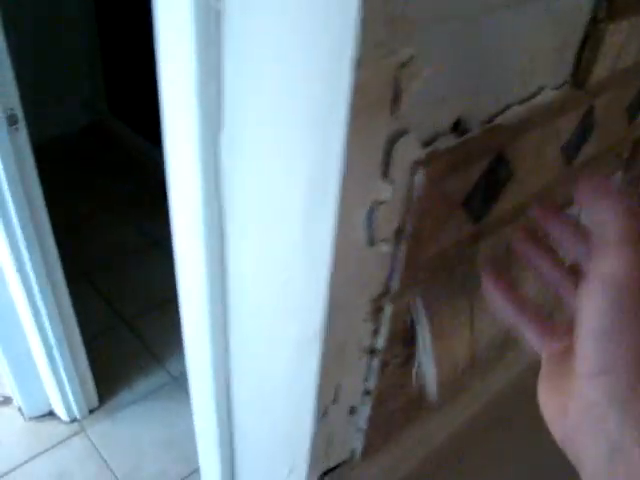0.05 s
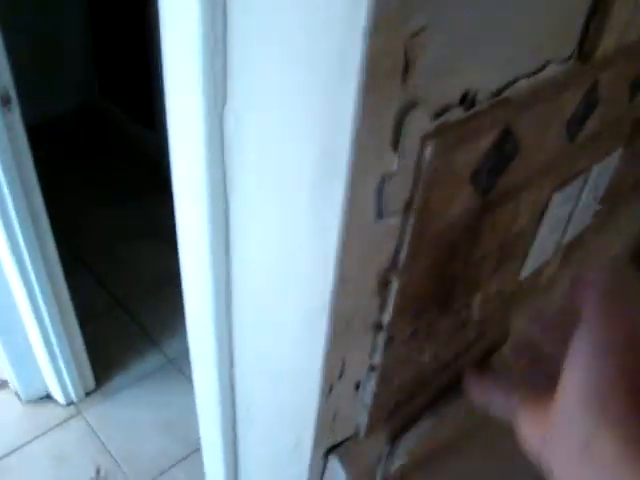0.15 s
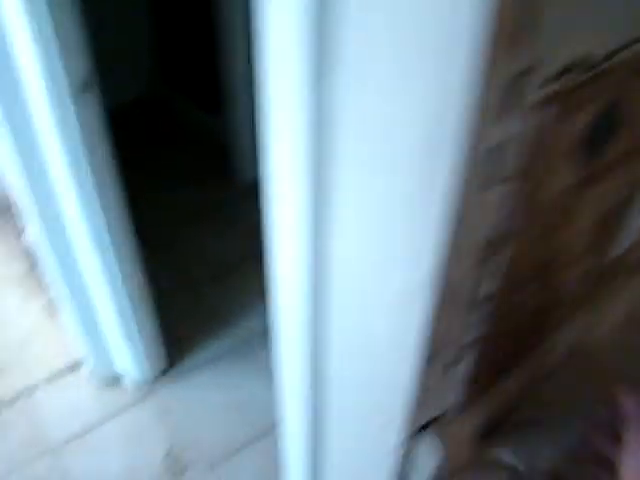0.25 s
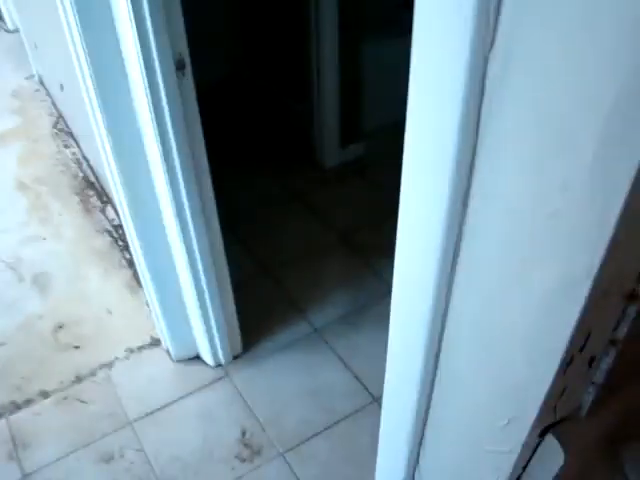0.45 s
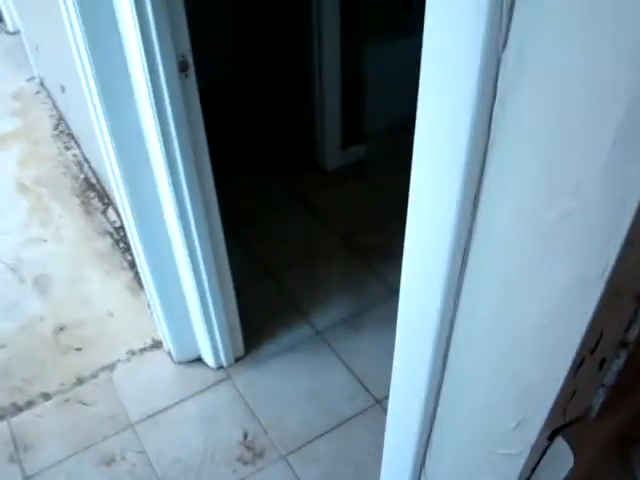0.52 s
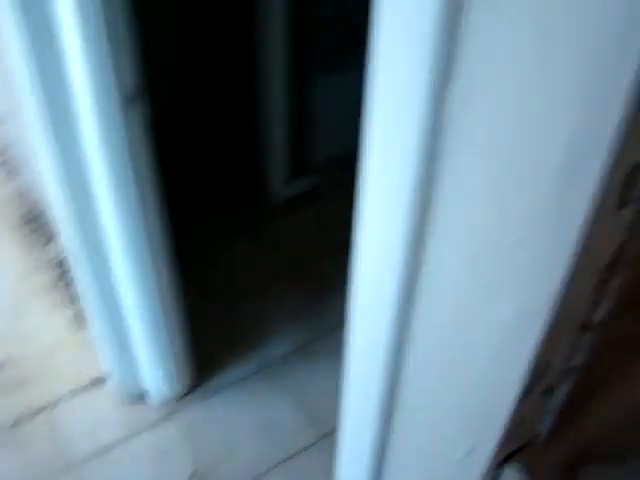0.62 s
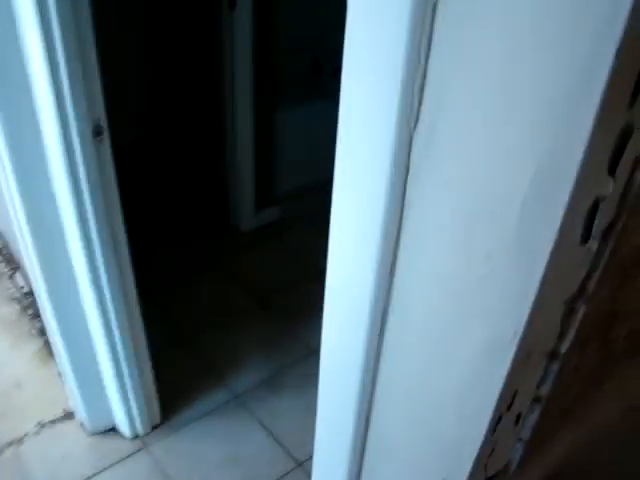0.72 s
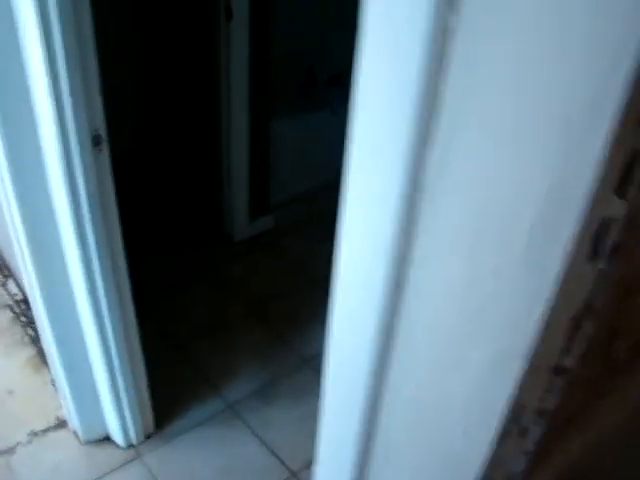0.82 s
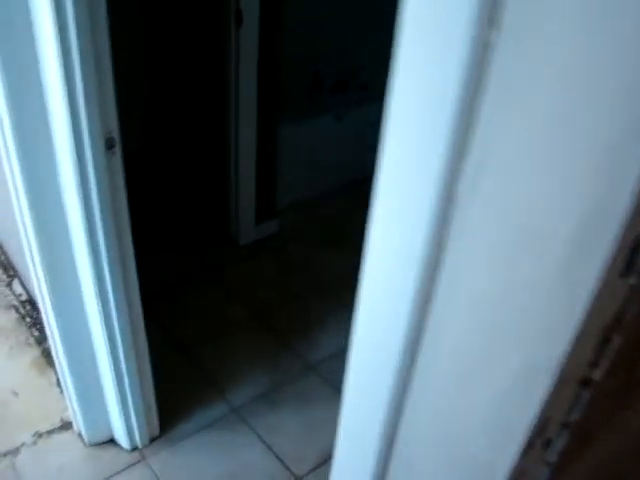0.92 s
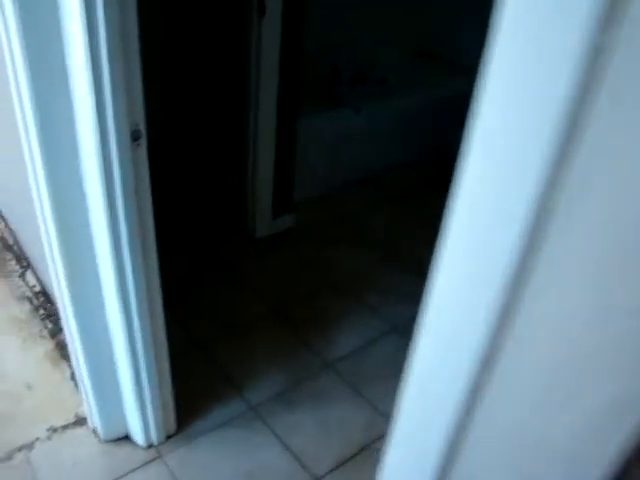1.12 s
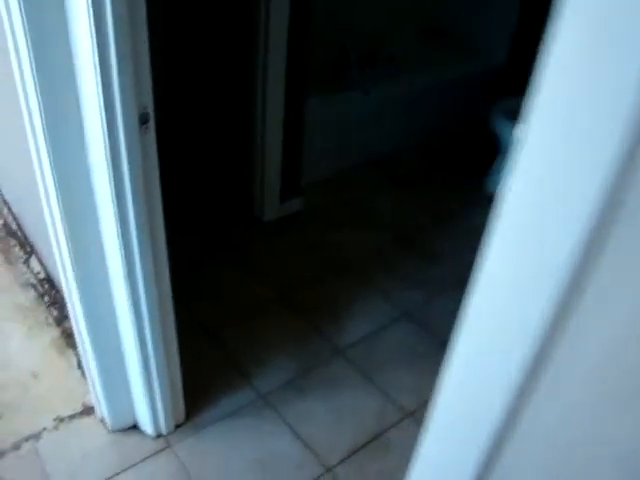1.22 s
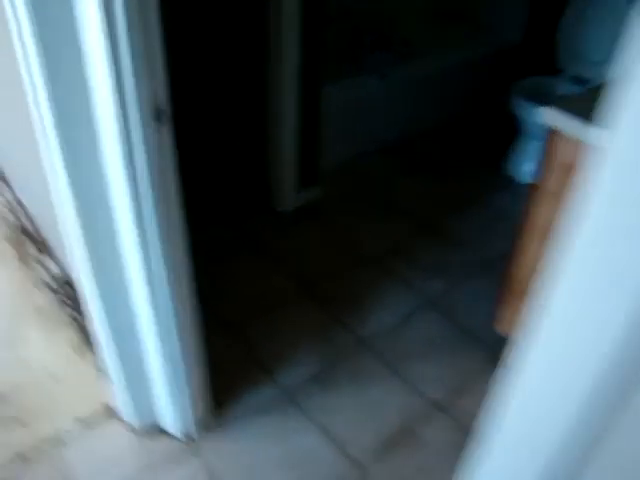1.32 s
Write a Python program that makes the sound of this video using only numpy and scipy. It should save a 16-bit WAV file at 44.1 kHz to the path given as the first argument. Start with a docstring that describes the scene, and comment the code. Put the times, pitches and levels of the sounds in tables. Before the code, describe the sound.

A wall tile snaps loose, crashes onto a hard floor and shatters in an echoing room.

```python
"""A loose wall tile is pried off in a bare, echoing kitchen. Mortar ticks and grates; the tile clinks
free and snaps. It crashes on the hard floor and breaks, setting the room's modes ringing; the small
recorder limits the crash. Pieces clatter, crumbs scatter, and a last chip clicks nearby as the room
rings out. Soft handling bumps follow. Room air and a low hum lie underneath."""
import sys
import numpy as np
from scipy import signal
from scipy.fft import rfft, irfft, next_fast_len
from scipy.io import wavfile
from scipy.ndimage import uniform_filter1d, minimum_filter1d, map_coordinates

SR = 44100
rng = np.random.default_rng(int(sys.argv[2]) if len(sys.argv) > 2 else 0)


def store_wav(level_fs):
    """Save 16-bit WAV to argv[1]."""
    pcm = np.round(np.clip(np.atleast_2d(level_fs), -1, 1) * 32767)
    wavfile.write(sys.argv[1], SR, pcm.T.astype(np.int16))


N = 59535


def crash():
    """The tile slaps down and breaks in a quick run of blows, which wake the room's resonances."""
    blows = [(0.264, -7, 0.0776, -3), (0.2724, -5.5, 0.0348, 0), (0.278, -4.5, 0.0697, 1),
             (0.2841, -11, 0.0467, -1), (0.294, -7.5, 0.0676, 1), (0.3297, -11, .02, 3),
             (0.354, -16, 0.049, -4), (0.378, -23, 0.053, 3.5)]  # t/s, level/dB, t60/s, tilt/(dB/oct)
    colour = [(40, -62), (130, -27), (250, -4.5), (500, -1.5), (850, 2.5), (1400, 2), (2600, -6),
              (3500, -12), (6000, -20.5), (10000, -31.5)]  # blow spectrum: f/Hz, level/dB
    room_modes = [(252, -8, 1), (429, -4, 1), (467, -3, 1), (506, -2, 1), (572, -2, 1.1), (640, 0, 1.2),
                  (815, -1, 1.2), (932, 1, 1.2), (1027, 0, 1), (1142, -2, 1.2), (1179, 1, 1.2),
                  (1266, -1, 1.1), (1419, 0, 1), (1492, -4, 1), (1685, -5, 1.1), (1797, -3, 1)]  # f/Hz, relative level/dB, t60/s
    return contacts(blows, colour, room_db=1.4767) + room_ring(blows[0][0], room_modes, gain_db=-24)


def pieces():
    """Smaller, brighter pieces clatter down and wake higher resonances."""
    landings = [(0.396, -17, 0.057, -2.5), (0.4011, -8, 0.0171, 2), (0.413, -13, 0.07, .5),
                (0.429, -13, 0.0564, 1), (0.4495, -18.5, 0.107, 0), (0.4679, -15.5, 0.06, 0.5),
                (0.5053, -30.5, 0.0295, 7.5), (0.549, -35, 0.017, 7)]  # t/s, level/dB, t60/s, tilt/(dB/oct)
    colour = [(40, -39), (140, -24.5), (250, -5.5), (500, -4.5), (1100, -3.5), (1600, 2.5), (2200, 3),
              (2700, -4.5), (3200, -5.5), (5500, -19.5), (10000, -29)]  # landing spectrum: f/Hz, level/dB
    high_modes = [(1615, 0, .9), (1890, -1, .8), (2169, 0, .9), (2256, 1, .9), (2284, 0, .9),
                  (2880, -8, .7), (3031, -6, .5)]  # f/Hz, relative level/dB, t60/s
    return contacts(landings, colour, room_db=0) + room_ring(landings[0][0], high_modes, gain_db=-29.5)


def snaps():
    """Mortar and glaze crack near the microphone, short and bright."""
    cracks = [(0.1358, -22.5, 0.0043, 0), (0.140, -28.5, 0.0364, 8), (0.151, -35.5, 0.025, -1.5),
              (0.2472, -5, 0.0102, -2.5), (0.2521, -15.5, 0.024, 2.5), (0.265, -22.5, 0.0047, -4.5),
              (0.4008, -13.5, 0.0032, -6), (0.8835, -33, 0.0147, 14), (0.887, -19, 0.00487, 14),
              (0.889, -28, 0.0333, -3), (0.954, -31, 0.0057, -4.5)]  # t/s, level/dB, t60/s, tilt/(dB/oct)
    colour = [(100, -34), (400, -12), (1200, -15), (2100, -2), (3100, -1.5), (4400, 2.5), (5600, -8.5),
              (7000, -4), (8000, -7), (9300, -5.5)]  # crack spectrum: f/Hz, level/dB
    return contacts(cracks, colour, room_db=-13)


def thuds():
    """The weight of the whole tile bumps wall and floor."""
    knocks = [(0.138, -40.5, 0.067, 2), (0.151, -41, 0.136, -1.5), (0.249, -18.5, 0.111, -0.5),
              (0.263, -18.5, 0.061, -0.5), (0.285, -16, 0.068, -5.5), (0.322, -21, 0.053, 0.5),
              (0.470, -25.5, 0.066, -3.5)]  # t/s, level/dB, t60/s, tilt/(dB/oct)
    colour = [(30, -33), (70, -27), (110, -21), (165, -9), (200, -17), (260, 1), (450, 2), (800, 2.5),
              (1400, -7.5), (4000, -34)]  # knock spectrum: f/Hz, level/dB
    return contacts(knocks, colour, room_db=2.5)


def scrapes():
    """The back of the tile grates on loose mortar."""
    strokes = [(0.150, -40.5, 0.34, -3.5), (0.1815, -26, 0.1124, 4), (0.198, -36.5, 0.17, .5)]  # t/s, level/dB, t60/s, tilt/(dB/oct)
    colour = [(100, -11.5), (400, -3), (850, 5.5), (1500, -3.5), (2100, 7.5), (2500, 3), (3000, -0.5),
              (4000, -2.5), (6000, -7), (10000, -13)]  # grating spectrum: f/Hz, level/dB
    return contacts(strokes, colour, room_db=-11)


def clink(start_s=0.182, gain_db=-36.5):
    """The still whole tile knocks against the wall and rings briefly."""
    tile_modes = [(509, -14.5, .25), (751, -2, .25), (1673, -13.5, 0.2), (2047.5, 1, 0.307), (2210, -5, .2),
                  (2760, 0.5, .08), (2986, -3.5, 0.363), (3146, -3.5, .2), (4090, -1.5, 0.13)]  # f/Hz, relative level/dB, t60/s
    return amp(gain_db) * ring(start_s, tile_modes, waver_db=3)


def crumbs(count=50, start_s=0.25, span_s=0.75, fade_db_per_s=48, centre_hz=2062, t60_s=0.0074):
    """Bits of mortar tick on the floor ever more faintly, each at its own pitch."""
    out, t = np.zeros(2 * N), np.arange(1024) / SR
    for when, pitch, weight in rng.random((count, 3)):
        delay_s = span_s * when ** 2  # densest at first
        level_db = -24.5 - fade_db_per_s * delay_s + 6.5 * (2 * weight - 1)
        hz = centre_hz * 2 ** (2 * pitch - 1)
        tick = np.exp(-np.log(1000) * t / t60_s) * np.sin(2 * np.pi * hz * t)
        out[round((start_s + delay_s) * SR):][:len(t)] += amp(level_db) * tick
    return out[:N]


def contacts(hits, colour, room_db):
    """Crunching contacts of one material, each with its own brightness, and their echo."""
    direct, sources = np.zeros(N), []
    for start_s, level_db, t60_s, tilt_db_per_oct in hits:
        crunch = burst(start_s, level_db, t60_s)
        direct += coloured(crunch, [(hz, db + tilt_db_per_oct * np.log2(hz)) for hz, db in colour])
        sources.append((start_s, np.sum(crunch ** 2)))
    return direct + amp(room_db) * coloured(echo(sources), colour)


def burst(start_s, level_db, t60_s):
    """The brittle crunch of one contact: decaying noise."""
    envelope = decay(start_s, t60_s)
    crunch = envelope * rng.standard_normal(N)
    return amp(level_db) * crunch * np.linalg.norm(envelope) / np.linalg.norm(crunch)


def ring(start_s, modes, waver_db):
    """Decaying modes whose levels waver."""
    out, age_s = np.zeros(N), since(start_s)
    for hz, level_db, t60_s in modes:
        envelope = amp(level_db + waver_db * wobble()) * decay(start_s, t60_s)
        out += envelope * np.sin(2 * np.pi * (hz * age_s + rng.random()))
    return out


def room_ring(start_s, modes, gain_db, rise_s=0.009):
    """Resonances build up after an impact and ring out."""
    rise = 1 - np.exp(-since(start_s) / rise_s)
    return rise * amp(gain_db) * ring(start_s, modes, waver_db=2)


def echo(sources, build_s=0.0043):
    """Diffuse ring of bare walls after contacts (t/s, energy); the midrange lasts longest."""
    reverb_times = [(60, .5), (150, 0.73), (260, 1.21), (600, 1.367), (1200, 1.35), (2200, 1.23),
                    (4000, 1.085), (6000, 0.71), (9500, 0.59)]  # f/Hz, t60/s
    hz, t, noise = signal.stft(rng.standard_normal(N), SR, nperseg=256)
    loss_per_s = 2 * np.log(1000) / log_interp(reverb_times, hz)[:, None]
    power = 0
    for start_s, energy in sources:
        age_s = np.maximum(t - start_s, 0)
        build = (1 - np.exp(-age_s / build_s)) ** 2
        power = power + energy * loss_per_s / SR * np.exp(-loss_per_s * age_s) * build
    return signal.istft(noise * np.sqrt(power), SR, nperseg=256)[1][:N]


def handling():
    """The hand shifts on the recorder; nothing of it reaches the room."""
    bumps = [(0.935, -53.5, 0.136, 3.5), (0.995, -51.5, 0.24, 5.5), (1.045, -53.5, 0.102, 3),
             (1.065, -57.5, .03, -3)]  # t/s, level/dB, t60/s, tilt/(dB/oct)
    colour = [(25, -5), (60, 2.5), (130, -6), (250, 1.5), (450, -14), (2000, -33.5)]  # bump spectrum: f/Hz, level/dB
    return contacts(bumps, colour, room_db=-np.inf)


def rubbing():
    """The hand rubs faintly: two swells of noise."""
    rubs = [(0.065, 0.034, -50.5), (.94, .05, -60.5)]  # t/s, half-width/s, level/dB
    colour = [(100, 2), (2000, -12), (5000, -3.5), (10000, -6)]  # rub spectrum: f/Hz, level/dB
    t = since(0)
    envelope = sum(amp(db) * np.exp(-((t - peak_s) / width_s) ** 2) for peak_s, width_s, db in rubs)
    return envelope * coloured(rng.standard_normal(N), colour)


def hum(hz=252, waver_db=2.5):
    """A wavering low hum in the room that fades near the end."""
    levels = [(0, -57), (.8, -50), (1.05, -57), (1.09, -74)]  # hum envelope: t/s, level/dB
    t = since(0)
    level_db = np.interp(t, *np.transpose(levels)) + waver_db * wobble()
    return amp(level_db) * np.sin(2 * np.pi * hz * t)


def air():
    """Quiet noise of the room air."""
    levels = [(0, -51), (.13, -58), (.7, -52.5), (1.35, -53.5)]  # air envelope: t/s, level/dB
    colour = [(25, -23), (100, -17.5), (170, -10.5), (250, -7), (500, -2), (1200, -6), (2500, -11.5),
              (5000, -16), (10000, -21)]  # air spectrum: f/Hz, level/dB
    level_db = np.interp(since(0), *np.transpose(levels))
    return amp(level_db) * coloured(rng.standard_normal(N), colour)


def amp(db):
    """Decibels to gain."""
    return 10 ** (np.asarray(db) / 20)


def log_interp(points, hz):
    """Interpolate (f/Hz, value) points on a log axis."""
    knots_hz, values = np.transpose(points)
    return np.interp(np.log(hz + 1), np.log(knots_hz + 1), values)


def since(start_s):
    """Seconds since start_s, zero before it."""
    return np.maximum(np.arange(N) / SR - start_s, 0)


def decay(start_s, t60_s):
    """Envelope that jumps up at start_s and dies away."""
    age_s = since(start_s)
    return (age_s > 0) * np.exp(-np.log(1000) * age_s / t60_s)


def wobble(knots_per_s=25):
    """Smooth random curve."""
    return map_coordinates(rng.standard_normal(200), [since(0) * knots_per_s], mode="mirror")


def coloured(x, colour, taps=2048, top_hz=12000):
    """Minimum-phase filter of shape (f/Hz, level/dB); white noise keeps its level."""
    hz = np.fft.rfftfreq(taps, 1 / SR)
    gain = amp(log_interp(colour, hz)) / np.sqrt(1 + (hz / top_hz) ** 24)
    gain /= np.sqrt(np.mean(gain ** 2) + 1e-20)
    cepstrum = irfft(np.log(gain), taps)
    cepstrum[1:taps // 2] *= 2  # fold onto positive time
    cepstrum[taps // 2 + 1:] = 0
    impulse = irfft(np.exp(rfft(cepstrum)), taps)
    return signal.oaconvolve(x, impulse)[:N]


def scene():
    """Everything at one microphone."""
    tile = snaps() + scrapes() + clink() + thuds() + crash() + pieces() + crumbs()
    return (tile + handling() + air() + hum() + rubbing())[None]


def record(dry, ceiling=0.604, hold_s=0.00155, top_hz=10050):
    """A fast limiter, then a steep low-pass."""
    hold = int(hold_s * SR)
    needed_gain = np.minimum(1, ceiling / (np.abs(dry) + 1e-9))
    limited = dry * uniform_filter1d(minimum_filter1d(needed_gain, hold), hold)
    size = 2 * next_fast_len(N)
    rolloff = np.sqrt(1 + (np.fft.rfftfreq(size, 1 / SR) / top_hz) ** 400)
    return irfft(rfft(limited, size) / rolloff, size)[:, :N]


dry = scene()
out = record(dry)
store_wav(out)
```